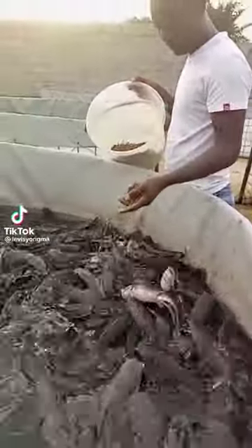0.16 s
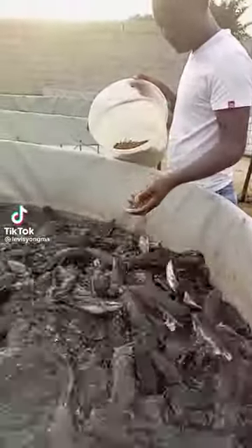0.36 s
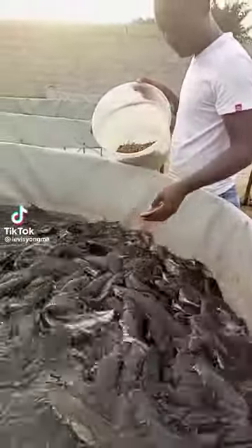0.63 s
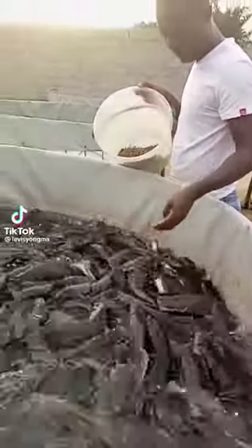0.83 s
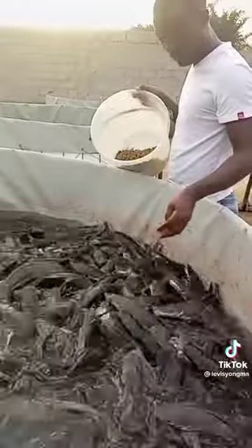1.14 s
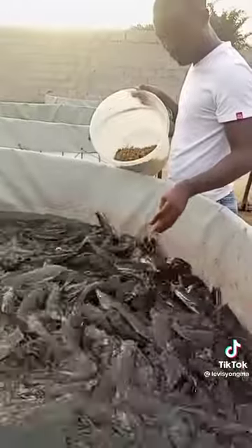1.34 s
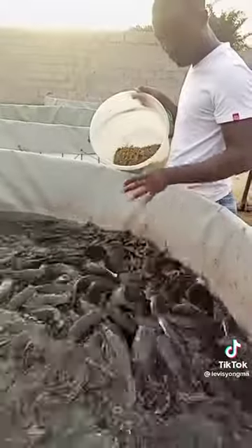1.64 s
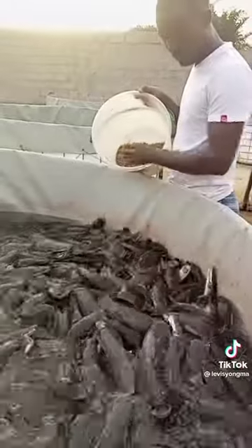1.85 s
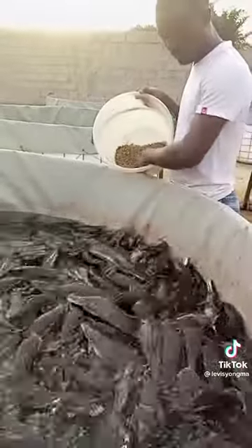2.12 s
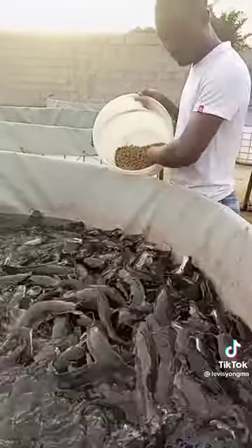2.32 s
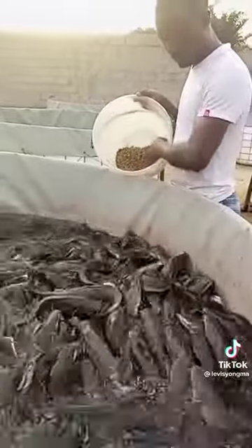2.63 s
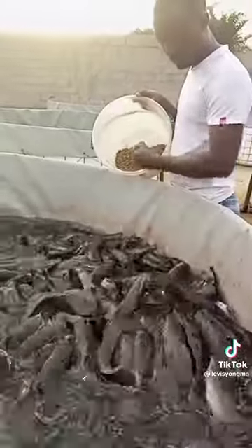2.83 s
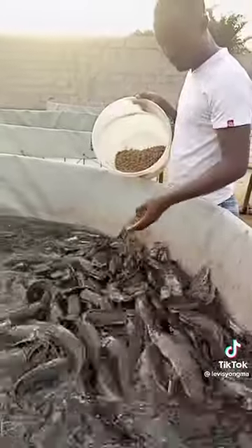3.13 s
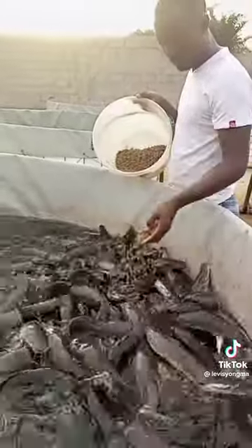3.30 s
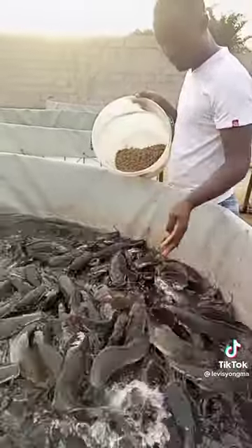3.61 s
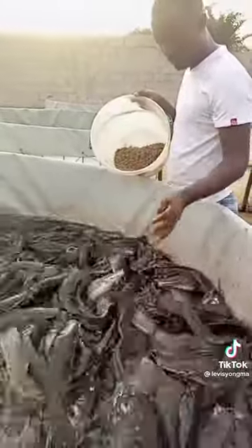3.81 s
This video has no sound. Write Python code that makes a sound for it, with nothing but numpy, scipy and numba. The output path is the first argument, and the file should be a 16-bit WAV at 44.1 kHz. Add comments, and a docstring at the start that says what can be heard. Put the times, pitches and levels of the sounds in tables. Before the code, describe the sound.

Many fish thrash at a tank's surface, churning water with gulping plops and sharp splashing slaps

```python
"""A shallow round tank, where a crowd of catfish thrashes at the surface a metre or two from a phone.
Countless small ringing bubbles over hiss make a churning bed. Near fish add gulping plops with froth,
dull surges of low, slow bubbles, and tail slaps that crack and throw jets of ringing droplets.
Stray drops tick at random, and a decaying noise tail gives the short echo of the tank."""
import sys
import numpy as np
from scipy import signal
from scipy.fft import rfft, irfft
from scipy.io import wavfile
from scipy.ndimage import uniform_filter1d
from numba import njit

SR = 44100
rng = np.random.default_rng(int(sys.argv[2]) if len(sys.argv) > 2 else 0)


def ratio_of_db(decibels):
    """Turn decibels (scalar or array-like) into linear amplitude factors; 0 dB maps to 1."""
    return 10 ** (np.asarray(decibels, float) / 20)


def master(y):
    """Save y as 16-bit WAV."""
    cut = np.clip(np.atleast_2d(y).T, -1, 1)
    pcm = np.round(cut * 32767)  # scale
    wavfile.write(sys.argv[1], SR, pcm.astype(np.int16))


N = 174636  # length in samples

# plops, air pockets that close as a fish gulps or dives:
# start_s [s], level_db [dB, before each layer's offset], pitch_hz [Hz]
PLOP_EVENTS = [(0.004, -28, 360), (0.064, -30, 1180), (0.065, -24.5, 1544), (0.089, -30.5, 790),
               (0.11, -33, 1800), (0.113, -33, 815), (0.121, -18.5, 1658), (0.138, -29, 2630),
               (0.154, -46, 780), (0.3, -26.5, 765), (0.354, -24, 845), (0.366, -20, 651),
               (0.436, -24, 661), (0.455, -27, 1570), (0.633, -25, 1197), (0.748, -29, 1470),
               (0.762, -31, 857), (0.788, -33, 440), (0.915, -31, 1117), (0.925, -24, 784),
               (0.959, -33, 495), (0.988, -26, 590), (1.009, -24, 1430), (1.16, -32, 940),
               (1.231, -31, 1560), (1.536, -25, 1325), (1.787, -29.5, 922), (1.831, -34.5, 980),
               (1.975, -37, 690), (2.008, -33.5, 1260), (2.066, -33.5, 2730), (2.072, -30, 501),
               (2.205, -36.5, 985), (2.277, -21.5, 510), (2.441, -25.5, 1322), (2.464, -20.5, 365),
               (2.489, -23.5, 1260), (2.621, -29, 860), (2.68, -33.5, 2420), (2.83, -30, 803),
               (2.941, -30.5, 1510), (3.083, -24.5, 1540), (3.119, -27, 1480), (3.525, -34, 880),
               (3.551, -27.5, 1860), (3.56, -41, 325), (3.608, -33.5, 747), (3.655, -30, 701),
               (3.657, -30, 1560), (3.674, -28.5, 717), (3.708, -30.5, 691), (3.715, -30, 1320),
               (3.722, -34, 883), (3.74, -29.5, 1497), (3.803, -28.5, 2116)]
TOP_HZ = 15600  # highest pitch, and the edge of the treble cut
EARLY = 0.12  # how far a swarm leads its event, as a share of the swarm's time scale


@njit
def bubbles(n, start, hz, cycles, size, glide, swell, sr):
    """Each bubble swells, rings for its cycles down to -26 dB and glides upward."""
    out = np.zeros(n)
    for j in range(len(start)):
        span = cycles[j] * sr / hz[j]  # samples
        state = 1j * size[j]
        turn = np.exp(2j * np.pi * hz[j] / sr - 3 / span)  # rotation and decay per sample
        bend = np.exp(2j * np.pi * hz[j] / sr * glide / span)
        unswollen = 1.
        shrink = np.exp(-1 / (swell * span))
        first = int(start[j] * sr)
        for i in range(max(first, 0), min(first + int(2 * span), n)):
            state, turn, unswollen = state * turn, turn * bend, unswollen * shrink
            out[i] += state.real * (1 - unswollen)
    return out


def ring(start, hz, cycles, size, glide):
    """Ring bubbles from arrays of any shape; cycles are given for 1 kHz, glide as a share of pitch."""
    cycles_rise = 0.6  # smaller bubbles ring more cycles: power of pitch
    swell_share = 0.25  # time constant of the swell, as a share of the ring
    hz = np.clip(hz, 30, TOP_HZ)
    cycles = cycles * (hz / 1000) ** cycles_rise
    flat = [np.ravel(v).astype(float) for v in np.broadcast_arrays(start, hz, cycles, size)]
    return bubbles(N, *flat, float(glide), swell_share, float(SR))


def unit(x):
    """Scale to rms 1."""
    return x / np.sqrt(np.mean(x ** 2))


def walk(rate):
    """Random levels held 1 / rate s and slewed; spread 1."""
    hold = int(SR / rate)
    steps = rng.standard_normal(N // hold + 1)
    return unit(uniform_filter1d(steps[np.arange(N) // hold], hold))


def colour_db(hz):
    """Colour of the splashing as the phone hears it: gain in dB at hz, drawn over log frequency; the phone's
    microphone dips the treble near 3.6 and 13 kHz and lifts it near 14.6 kHz."""
    # spectral colour of the sound: freq_hz [Hz], gain_db [dB]
    spectral_colour = [(18, -60), (30, -27), (149, -11), (220, -8), (838, 1.5), (1120, -4), (1530, 5),
                       (1750, -4), (2150, -1.5), (3640, -18), (4040, -14), (6830, -14.5), (8200, -23),
                       (10100, -20.5), (13200, -42.5), (14600, -27), (15800, -29.5)]
    freq_hz, gain_db = np.array(spectral_colour).T
    return np.interp(np.log(np.maximum(hz, 1)), np.log(freq_hz), gain_db)


def swarm(rows, count):
    """Table columns, and chance for count bubbles per event: lateness 0-1, pitch offset, size."""
    shape = (len(rows), count)
    late = rng.random(shape)
    off = rng.standard_normal(shape)
    big = rng.exponential(size=shape)
    columns = [c[:, None] for c in np.array(rows, float).T]
    return columns, late, off, big


def flurries():
    """Small splashes at random moments swell and fade: a log envelope with mean 0, spread 1."""
    per_s, fade_s, smooth_s = 40, 0.0087, 0.021
    chance = rng.random((2, N))
    kicks = (chance[0] < per_s / SR) * -np.log(chance[1])
    fading = signal.lfilter([1], [1, -np.exp(-1 / (fade_s * SR))], kicks)
    env = np.log(uniform_filter1d(fading, int(smooth_s * SR)) + 0.15)
    return unit(env - env.mean())


def churn():
    """Dense small bubbles over hiss; octave bands swell together and flicker alone."""
    # churn of the whole shoal: time_s [s], level_db [dB], tilt_db [dB of treble lift at 4 kHz]
    shoal_churn = [(0.0, -44, 1.5), (1.36, -48.5, 1), (2.53, -47, 1), (3.42, -51.5, 5.5), (3.96, -48.5, 5)]
    per_s, mean_cycles, glide = 7000, 17.3, 0.0052  # cycles at 1 kHz
    spread_db, hiss_db = 3, -1.5  # spread per e-fold of chance; hiss against the bubbles
    flurry_db, own_db, flicker_hz = 1, 2, 24.724  # rms swing shared by all bands, and each band's own

    u = rng.random((4, int(per_s * N / SR)))
    hz = 100 * 156 ** u[1] ** 0.7  # 100 Hz to 15.6 kHz
    size = hz * ratio_of_db(-spread_db * np.log(u[3] + 0.003))
    grains = ring(u[0] * N / SR, hz, mean_cycles * (0.5 + u[2]), size, glide)

    f = np.fft.rfftfreq(N, 1 / SR)
    bed = unit(grains) + ratio_of_db(hiss_db) * rng.standard_normal(N)
    spec = rfft(bed) * ratio_of_db(colour_db(f))
    spec = spec / np.sqrt(np.mean(irfft(spec, N) ** 2))

    t = np.arange(N) / SR
    time_s, level_db, tilt_db = np.array(shoal_churn).T
    level_now = np.interp(t, time_s, level_db)
    tilt_now = np.interp(t, time_s, tilt_db)
    flurry = flurries()
    octave = np.log2(np.maximum(f, 1) / 1000)
    out = 0
    for o in np.arange(-5, 5):  # overlapping bands, in octaves from 1 kHz
        band = irfft(spec * np.clip(1 - abs(octave - o), 0, 1), N)
        swing_db = flurry_db * flurry + own_db * walk(flicker_hz)
        out = out + band * ratio_of_db(level_now + tilt_now * max(o, 0) / 2 + swing_db)
    return out


def plops():
    """A leading air pocket amid smaller ones, most near its pitch, a few far off."""
    cycles, glide = 16.4, 0.028  # cycles at 1 kHz; upward glide as a share of pitch
    scatter, lead_db, trail_db, trail_s = 0.041, 2.5, -3, 0.045
    (start_s, level_db, pitch_hz), late, off, big = swarm(PLOP_EVENTS, count=14)
    lead = ring(start_s, pitch_hz, cycles, ratio_of_db(level_db + lead_db), glide)
    hz = pitch_hz * np.exp(np.clip(scatter * off * (1 + off ** 2), -0.5, 0.5))
    # pockets weaken with lateness and with distance from the pitch
    size = ratio_of_db(level_db + trail_db - 2.9 * abs(off) - 2.9 * late) * big ** 0.25
    return lead + ring(start_s + (late ** 1.6 - EARLY) * trail_s, hz, cycles, size, glide)


def slosh():
    """Froth released by each plop: many brief bubbles over octaves, thickest at the start."""
    froth_db, spread_octaves, cycles, fade_s = -17, 1.14, 7.7, 0.023  # cycles at 1 kHz
    (start_s, level_db, pitch_hz), late, off, big = swarm(PLOP_EVENTS, count=60)
    hz = np.clip(pitch_hz * 2 ** (spread_octaves * off), 120, 9000)
    size = ratio_of_db(level_db + froth_db + colour_db(hz) - colour_db(pitch_hz)) * np.sqrt(big * hz / pitch_hz)
    return ring(start_s - fade_s * np.log(1.001 - late), hz, cycles, size, 0.02)


def surges():
    """A body shoves water: a few large slow pockets start through most of each shove."""
    # surges: start_s [s], length_s [s], level_db [dB, before the layer's gain], pitch_hz [Hz]
    shoves = [(0.004, 0.11, -47, 350), (0.124, 0.04, -49, 243), (0.443, 0.06, -60, 111),
              (0.645, 0.032, -53, 254), (0.77, 0.038, -56, 190), (0.89, 0.17, -51.5, 139.5),
              (1.143, 0.049, -57.5, 117), (1.874, 0.063, -54.5, 75), (1.974, 0.039, -50.5, 252),
              (2.069, 0.065, -50.5, 197), (2.101, 0.058, -62, 83), (2.281, 0.0366, -50, 200),
              (2.46, 0.06, -44.5, 304), (2.47, 0.07, -56, 134), (2.616, 0.04, -61, 135),
              (3.792, 0.08, -53.5, 125), (3.8, 0.072, -51, 292), (3.905, 0.036, -62.5, 116)]
    cycles, scatter, gain_db, glide = 12.6, 0.14, 9.5, 0.26  # cycles at 1 kHz; glide as a share of pitch
    (start_s, length_s, level_db, pitch_hz), late, off, big = swarm(shoves, count=10)
    hz = pitch_hz * np.exp(scatter * off)
    size = ratio_of_db(level_db + gain_db) * np.sqrt(big)
    return ring(start_s + late * length_s * 0.76, hz, cycles, size, glide)


def fold(hz):
    """Fold pitches past the top back down, and keep them above 1 kHz."""
    return np.maximum(np.minimum(hz, 2 * TOP_HZ - hz), 1000)


def sprays():
    """Each tail slap cracks and throws jets of droplets that build and thin, each jet near one pitch."""
    # tail slaps: start_s [s], level_db [dB, before the layer's offsets],
    # pitch_hz [Hz, of the leading jet], length_s [s, droplets spread over 1.6 times this]
    slaps = [(0.1221, -26, 7080, 0.015), (0.2064, -29, 3340, 0.027), (0.2588, -27, 4800, 0.042),
             (0.3157, -26, 6390, 0.029), (0.4244, -26.5, 5850, 0.1), (0.4973, -25.5, 6900, 0.086),
             (0.7462, -25.5, 6630, 0.033), (0.8859, -28.5, 7240, 0.022), (0.9138, -25.5, 5770, 0.026),
             (0.9393, -26, 4850, 0.055), (1.1523, -31, 4300, 0.037), (1.2311, -31, 4130, 0.032),
             (1.5499, -30.5, 4560, 0.024), (1.8023, -30.5, 5300, 0.031), (1.8213, -25.5, 6090, 0.017),
             (2.0732, -32, 3530, 0.036), (2.2762, -20.5, 5200, 0.039), (2.3074, -20.5, 5910, 0.057),
             (2.3935, -26, 5620, 0.06), (2.4558, -25.5, 5030, 0.03), (2.4658, -20.5, 4590, 0.041),
             (2.4887, -17.5, 3936, 0.025), (3.0031, -31.5, 7300, 0.024), (3.0824, -34, 3370, 0.03),
             (3.2605, -29.5, 4390, 0.025), (3.3044, -20.5, 5540, 0.021), (3.3205, -38, 5500, 0.0074),
             (3.3413, -25.5, 6100, 0.035), (3.3954, -29.5, 4250, 0.035), (3.6496, -28.5, 6820, 0.015),
             (3.6706, -20, 6470, 0.045), (3.715, -21.5, 6280, 0.035), (3.8147, -27.5, 5920, 0.015),
             (0.2593, -29.5, 15940, 0.02), (0.3551, -34.5, 14240, 0.016), (1.9066, -36, 10930, 0.012),
             (2.2724, -26.5, 8180, 0.016), (2.4663, -21, 10150, 0.014), (3.2995, -30.5, 14660, 0.012),
             (3.5997, -29.5, 11300, 0.015), (3.6716, -24, 15600, 0.043)]
    jets, spread_octaves, jet_octaves = 11, 0.6, 0.026  # pitch spread between jets, and within a jet
    drop_cycles, drops_db, lead_db = 10.9, -17.5, 9  # cycles at 1 kHz; lift of the leading jet
    crack_cycles, crack_db, crack_s = 2, -10, 0.002
    (start_s, level_db, pitch_hz, length_s), late, off, big = swarm(slaps, count=220)
    jet = np.arange(off.shape[1]) % jets
    other = jet > 0  # all but the leading jet

    hz = fold(pitch_hz * 2 ** (spread_octaves * off[:, jet] * other + jet_octaves * off[:, ::-1]))
    drop_db = level_db + drops_db + lead_db * (jet == 0) + colour_db(hz) - colour_db(pitch_hz)
    jet_size = np.sqrt(big[:, jet]) ** other  # shared by the drops of a jet
    build_and_thin = np.sin(np.pi * late ** 0.29)
    size = ratio_of_db(drop_db) * np.sqrt(big * jet_size * hz / pitch_hz) * build_and_thin
    drops = ring(start_s + (late - EARLY) * 1.6 * length_s, hz, drop_cycles, size, 0)

    # the slap's own broad crack, two brief pings for each jet
    crack_hz = fold(pitch_hz * 2 ** off[:, -2 * jets:])
    ping_db = level_db + crack_db + colour_db(crack_hz) - colour_db(pitch_hz)
    crack_size = ratio_of_db(ping_db) * crack_hz / pitch_hz
    crack = ring(start_s + crack_s * late[:, -2 * jets:], crack_hz, crack_cycles, crack_size, 0)
    return crack + drops


def ticks():
    """Single drops landing at random, each a short stack of treble pings."""
    per_s, tick_db, cycles, stack_s = 59, -47.5, 1.5, 0.00082  # cycles at 1 kHz
    u = rng.random((int(per_s * N / SR), 14))
    start_s = u[:, :1] * N / SR
    hz = 2500 * 6 ** u[:, 2:]  # 2.5 to 15 kHz
    drop_db = tick_db - 3.2 * np.log(u[:, 1:2] + 0.03)
    size = ratio_of_db(drop_db + colour_db(hz) - colour_db(6000)) * hz / 6000
    return ring(start_s + stack_s * u[:, :1:-1], hz, cycles, size, 0)


def tank_echo(splashes):
    """Diffuse echo off the wall and the rough water: a delayed, decaying noise tail."""
    t60_s, echo_db, delay_s = 0.12, -14, 0.0019
    t = np.arange(SR // 4) / SR
    tail = rng.standard_normal(len(t)) * ratio_of_db(-60 * t / t60_s) * (t > delay_s)
    tail = tail / np.sqrt(np.sum(tail ** 2))
    return ratio_of_db(echo_db) * signal.fftconvolve(splashes, tail)[:N]


def scene():
    """Near splashes and churn, with the tank's echo, as one channel."""
    splashes = churn() + plops() + slosh() + surges() + sprays() + ticks()
    return (splashes + tank_echo(splashes))[None]


def band_limit(x):
    """A steep low-pass at the top of the band."""
    return signal.sosfilt(signal.butter(12, 16340, fs=SR, output="sos"), x)


def record(dry):
    """The phone cuts the deep bass and the top."""
    low_hz = 56  # the microphone hears little below
    top_cut = signal.ellip(8, 0.2, 60, TOP_HZ, fs=SR, output="sos")
    bass_cut = signal.butter(3, low_hz, "high", fs=SR, output="sos")
    mix = signal.sosfilt(np.vstack([top_cut, bass_cut]), dry)
    return band_limit(mix)


dry = scene()
out = record(dry)
master(out)
```